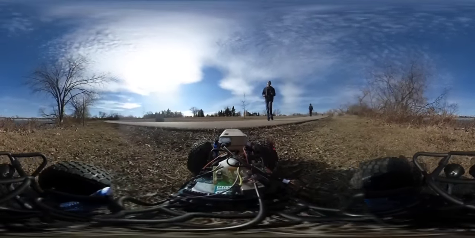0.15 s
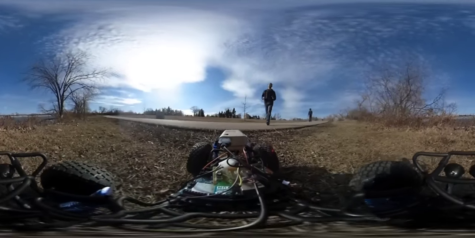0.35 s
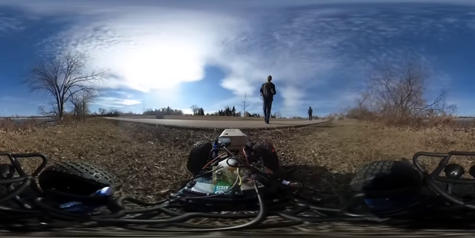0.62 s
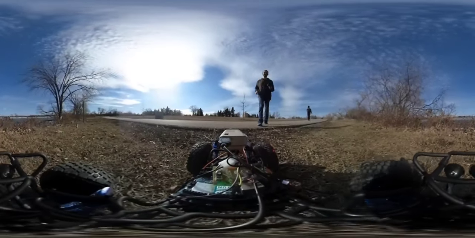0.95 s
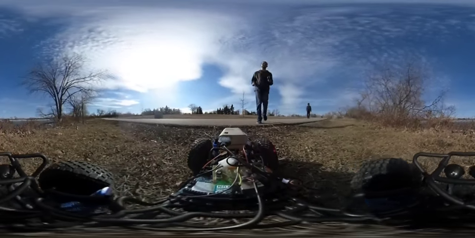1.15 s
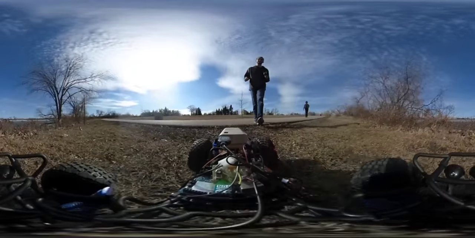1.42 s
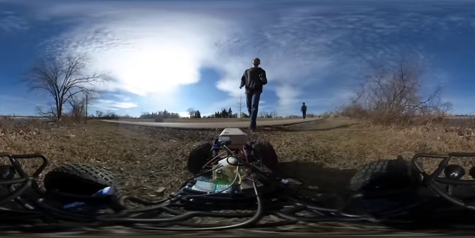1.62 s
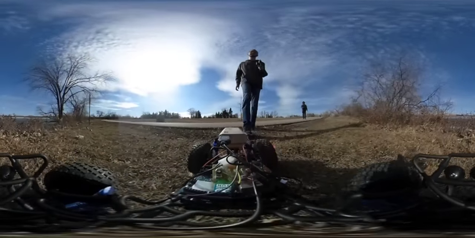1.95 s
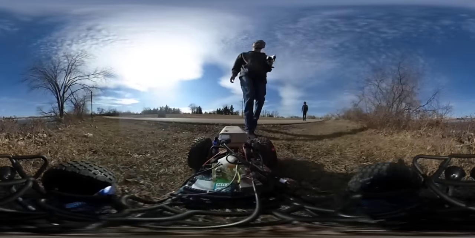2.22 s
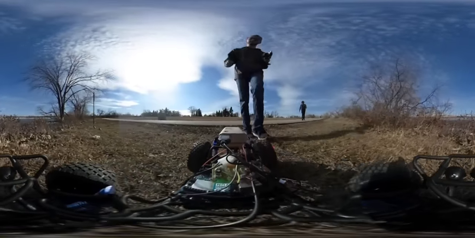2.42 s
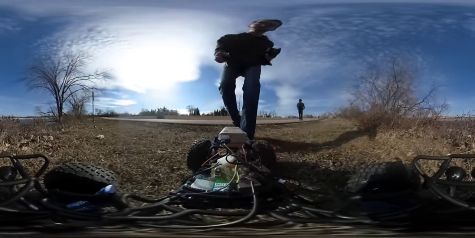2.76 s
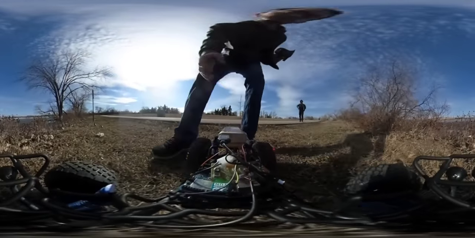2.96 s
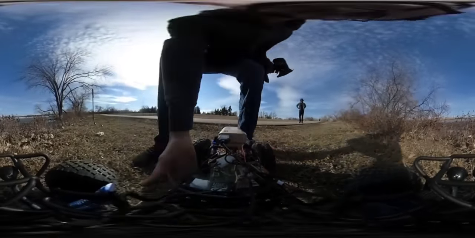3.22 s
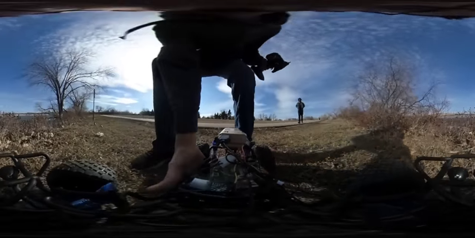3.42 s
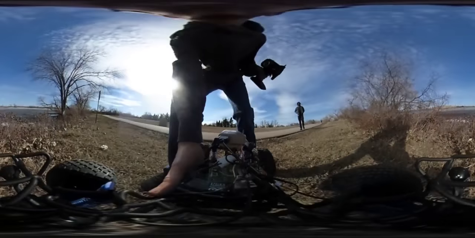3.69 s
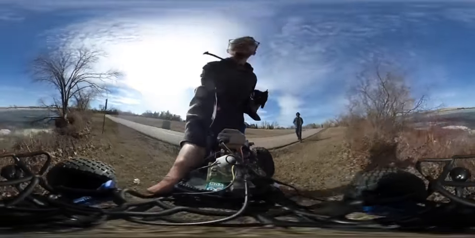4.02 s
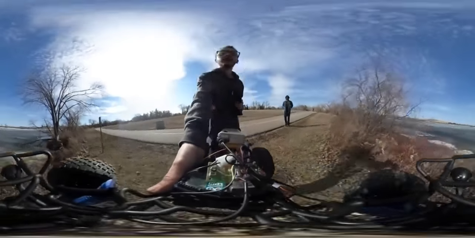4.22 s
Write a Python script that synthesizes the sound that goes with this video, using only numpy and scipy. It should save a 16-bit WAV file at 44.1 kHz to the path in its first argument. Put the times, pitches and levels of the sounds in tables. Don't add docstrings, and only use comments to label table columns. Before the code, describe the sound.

Outdoors in a windy field of dry grass, the microphone rides on a small plastic off-road car. Low, lumpy wind rumbles throughout with separate gusts. From the start, stalks crunch and shell knocks clatter, with a hard twig crack at 0.13 s and splitting bursts at 0.65 and 0.8 s. A crunch and thud come at 1.1 s, then a gritty gear whine dips and climbs from about 1.2 to 1.55 s, ending among loud knocks and cracks until 1.8 s. A long split and crunch at 2.04 s precede a quick rising whine at 2.1-2.3 s and a very hard, overloaded crack at 2.35 s. Smaller snaps fade; from 2.7 s cloth swells, swishing fullest near 3.1 s. Sharp cracks cluster at 3.35-3.55 s. Then light taps, short cloth rubs around 3.85 s and after 4.15 s, and a barely audible high gear whine finish over wind.

```python
import sys
import numpy as np
from scipy import signal
from scipy.fft import rfft, irfft
from scipy.io import wavfile
from scipy.ndimage import uniform_filter1d

SR = 44100
rng = np.random.default_rng(int(sys.argv[2]) if len(sys.argv) > 2 else 0)


def nominal_scale(level):
    x = np.asarray(level, float) / 20
    return 10 ** x


def log_audio(samples):
    frames = np.atleast_2d(samples).T
    limited = np.clip(frames, -1, 1)
    pcm = np.round(limited * 32767).astype(np.int16)
    wavfile.write(sys.argv[1], SR, pcm)


N = 192364


def evened(x):
    return x / np.sqrt(np.mean(x ** 2) + 1e-20)


def over_time(rows):
    s, *columns = np.transpose(rows)
    return [np.interp(np.arange(N) / SR, s, column) for column in columns]


def coloured(x, points):
    spectrum_hz, level_db = np.transpose(points)
    hz = np.fft.rfftfreq(x.shape[-1], 1 / SR)
    filter_db = np.interp(np.log(hz + 1), np.log(spectrum_hz + 1), level_db)
    return irfft(rfft(x) * nominal_scale(filter_db), x.shape[-1])


def wander(hz):
    return evened(signal.lfilter([1], [1, -np.exp(-2 * np.pi * hz / SR)], rng.standard_normal(N)))


def bursts(start_s, hold_s, level_db, rise_db_per_s, fade_db_per_s):
    t = np.arange(0, N / SR + .002, .001)[:, None]
    rising = rise_db_per_s * np.maximum(start_s - t, 0)
    fading = fade_db_per_s * np.maximum(t - start_s - np.abs(hold_s), 0)
    each = nominal_scale(level_db - rising - fading)
    return np.interp(np.arange(N) / SR, t[:, 0], np.linalg.norm(each, axis=1))


# start_s [s], level_db [dB]
WIND_LEVEL = [(0, -37), (.2, -23), (.6, -23.5), (1.25, -24.5), (1.33, -36), (1.5, -31), (2.2, -31),
              (2.7, -24.5), (3.5, -22.5), (4.18, -24.5), (4.23, -30), (4.36, -27)]
# pitch_hz [Hz], level_db [dB per Hz]
WIND_SPECTRUM = [(8.8, -37.5), (15, -2.5), (81, -1), (184, -7), (430, -20), (1840, -44.5), (3000, -82),
                 (3900, -111)]
# start_s [s], level_db [dB]
WIND_GUSTS = [(0.062, -18), (.33, -23.5), (.51, -28.5), (1.06, -20.5), (1.37, -22.5), (1.89, -27),
              (2.06, -20), (2.34, -24.5), (2.75, -23), (2.97, -26), (3.06, -20), (3.251, -22.5),
              (3.36, -20), (3.59, -17), (3.96, -21)]


def wind():
    lumps = nominal_scale(2.6 * uniform_filter1d(wander(hz=18.), 400))
    rumble = evened(coloured(lumps * rng.standard_normal(N), WIND_SPECTRUM))
    start_s, level_db = np.transpose(WIND_GUSTS)
    gusts = bursts(start_s, 0, level_db, rise_db_per_s=163.5, fade_db_per_s=216)
    steady = nominal_scale(over_time(WIND_LEVEL)[0])
    return np.hypot(steady, gusts) * rumble


def rings(modes, size=4096):
    hz, level_db, t60_s = np.transpose(modes)[:, :, None]
    t = np.arange(size) / SR
    soft_start = 1 - np.exp(-t * hz / 1.19)
    return nominal_scale(level_db - 60 * t / t60_s) * np.sin(2 * np.pi * hz * t) * soft_start


def breaks(per_s, spread_db):
    size = nominal_scale(spread_db * np.minimum(rng.exponential(1, N), 4))
    sign = rng.choice([-1., 1.], N)
    return evened(size * sign * (rng.random(N) < per_s / SR))


# pitch_hz [Hz], level_db [dB], t60_s [s]
TUB_MODES = [(408, -45, .04), (489.3, 12.5, 0.028), (667, 14.5, 0.021), (934, 22, 0.0075)]
# pitch_hz [Hz], level_db [dB], t60_s [s]
SHELL_MODES = [(1120, 0.5, 0.0098), (1360, 10, 0.0073), (1542, -10, 0.018), (1682, 0.5, 0.0096),
               (2101, -0.5, 0.0086), (2417, -6, 0.006), (2938, -11, 0.01)]
# pitch_hz [Hz], level_db [dB], t60_s [s]
THIN_MODES = [(3328, 5.5, 0.0046), (3854, -6.5, 0.0075), (4610, -1, 0.0046), (4870, -3.5, 0.0029),
              (5250, -7.5, 0.0081), (5950, 2, 0.0025), (7270, -7.5, 0.0041), (7880, -8.5, 0.0024),
              (9860, -6, 0.0025), (11120, -16.5, 0.005)]
# pitch_hz [Hz], level_db [dB per Hz]
RUSTLE_SPECTRUM = [(1500, -2), (3000, -14.5), (4800, -1), (6500, -35.5), (8300, -23.5), (9100, -33),
                   (10000, -35), (12000, -13)]
# start_s [s], hold_s [s], level_db [dB], fade_db_per_s [dB/s], dryness_db [dB]
STALK_LURCHES = [(0.037, 0.022, -10.5, 152, 4), (.055, 0.13, -15, 400, -1), (0.218, 0.09, -26.5, 200, -5),
                 (0.292, 0.023, -15, 591, -6), (0.372, 0.013, -21, 298, 4), (0.45, 0.027, -43.5, 68, -14),
                 (0.629, 0.093, -12.5, 317, 0.5), (0.649, .012, -6, 440, 6.5),
                 (0.814, 0.0056, -11, 373, -1), (0.866, 0.19, -35, 902, -3.5), (1.083, 0.024, -10.5, 91, 2),
                 (1.298, 0.32, -17, 203, -1.5), (1.647, 0.0089, -17, 153, 0), (1.71, 0.049, -27, 24.5, 3),
                 (2.011, .018, -10, 197, 3.5), (2.038, 0.025, -5, 147, 7.5), (2.176, 0.19, -20, 56.5, 3.5),
                 (2.582, 0.063, -25, 143, -1), (2.97, 0.16, -51, 100, 5.5), (3.362, 0.015, -14, 189, 3.5),
                 (3.485, 0.019, -15, 103, 6.5), (3.814, .015, -30, 128, 5), (3.964, 0.045, -33.5, 78, 10),
                 (4.248, 0.018, -36.5, 90, -14)]


def crunch():
    start_s, hold_s, level_db, fade, dryness_db = np.transpose(STALK_LURCHES)
    rise = 2797.5
    tub_lag_s = 0.0068
    shell = bursts(start_s, hold_s, level_db - 7.5, rise, fade)
    tub = bursts(start_s + tub_lag_s, hold_s, level_db - 11.5, rise, fade)
    air = bursts(start_s, hold_s, level_db + dryness_db - 23, rise, 1.43 * fade)
    clumps = nominal_scale(1.59 * uniform_filter1d(wander(hz=44.9), 100))
    shared = breaks(per_s=1200., spread_db=3.)

    def shaken(modes, gain):
        drive = []
        for _ in modes:
            own = breaks(per_s=1600., spread_db=5.0)
            drive.append(clumps * gain * (shared + 1.493 * own))
        ring = rings(modes)
        return signal.oaconvolve(drive, ring / np.linalg.norm(ring), axes=1)[:, :N].sum(0)

    stalks = 0.19 * shared + breaks(per_s=14000.0, spread_db=3.)
    rustle = .75 * evened(coloured(stalks, RUSTLE_SPECTRUM)) + shaken(THIN_MODES, nominal_scale(-5))
    return shaken(SHELL_MODES, shell) + shaken(TUB_MODES, tub) + clumps * air * rustle


# start_s [s], peak_db [dB], length_ms [ms]
TUB_THUDS = [(.0857, -10, 2.2), (0.632, -8.5, 2.1), (0.656, -4.5, 4), (0.9082, -18, 1.3),
             (1.0047, -18.5, 6.7), (1.098, -5, 3.6), (1.466, -5.5, 6), (1.567, 2, 1.7),
             (1.7378, -3.5, 0.57), (1.7893, -8, 4), (2.075, -7.2, 3.7), (2.116, -27, 1.3),
             (2.777, -29.5, 2.9), (2.871, -32, 5.2), (2.9707, -20.5, 3.6), (3.0783, -26.5, 5.3),
             (3.497, -4.5, 3.4), (4.275, -21, 2.2)]
# start_s [s], peak_db [dB], length_ms [ms]
TWIG_CRACKS = [(0.1337, 13.5, 3.6), (0.2296, -3, 1.8), (0.286, -1, 5.8), (.3117, -8, 4.7),
               (.383, -4.5, 1.4), (.652, -5.5, 1.7), (1.5589, 2.5, 2.5), (1.6128, -4.5, 1.3),
               (1.636, 5, 2.9), (2.3494, 5, 9.3), (2.3956, -8.5, 1.5), (2.484, -13.5, 5.8),
               (2.6755, -14.5, 8.1), (3.3806, 4.5, 1.8), (3.477, -7, 13), (3.4855, 11, 4.4),
               (3.8187, -17, 5.2), (3.9575, -14, 6), (3.9814, -12.5, 4.4), (4.0968, -19.5, 3.9),
               (4.268, -18.5, 3)]
# start_s [s], peak_db [dB], length_ms [ms]
STALK_SNAPS = [(.154, -31, 2.2), (0.3703, -11, 8.7), (.391, -16, 3), (.48, -23.5, 2.6), (0.882, -24, 3),
               (0.919, -27, 3), (0.982, -27, 2.7), (1.8268, -12.5, 1.1), (2.102, -6, 3.8),
               (2.294, -27, 8.5), (2.548, -19.5, 3), (2.5867, -11, 5.2), (2.9573, -26.5, 3.4),
               (3.362, -6.5, 2.3), (3.41, -9, 4.1), (3.5423, -1, 4), (3.724, -36, 5.5), (3.666, -28, 3.3),
               (3.8295, -14.5, 1.8), (3.886, -34, 4.3)]
# start_s [s], peak_db [dB], length_ms [ms]
SHELL_TAPS = [(.045, 0.5, 3.8), (.0533, 4, 2.6), (.2602, 1.5, 1.7), (.46, -24, 4.4), (.5092, -23.5, 2.9),
              (.576, -28.5, 4), (.595, -34, 4), (1.0845, -4, 1.6), (1.12, -10, 5), (1.1392, -13, 2.4),
              (1.916, -23.5, 3), (1.9783, -16, 3.5), (2.263, -7.5, 1.8), (2.3546, 16, 4.2),
              (2.4605, -10.5, 10), (2.6416, -16, 3.2), (2.709, -17, 5.2), (2.732, -22, 3.7),
              (2.821, -37, 3), (3.3491, -7, 4.4), (3.512, -3, 4.2), (3.7513, -20, 3.5), (3.8641, -20, 0.94),
              (3.999, -13, 3.7), (4.0188, -15, 1.6), (4.2366, -18.5, 4.1), (4.2607, -19, 0.99)]
# start_s [s], peak_db [dB], length_ms [ms]
TWIG_SPLITS = [
    (0.6445, -6, 4),
    (0.8186, 5, 2.4),
    (2.0382, 4.5, 9),
    (2.063, 1, 4.4),
    (2.327, -22, 3),
    (3.336, -21, 2.8),
    (3.552, -10, 5.7),
    (4.036, -15, 5.3),
]
# tub_db [dB above the peak], thin_db [dB above the peak]
BLOW_KINDS = [
    (5.5, -16),
    (-3, -9),
    (-7, -5),
    (-1.5, -17),
    (1.5, -0.8),
]


def knocks():
    tables = [TUB_THUDS, TWIG_CRACKS, STALK_SNAPS, SHELL_TAPS, TWIG_SPLITS]
    rows = [(*row, *kind) for table, kind in zip(tables, BLOW_KINDS) for row in table]
    start_s, peak_db, length_ms, tub_db, thin_db = np.transpose(rows)[:, :, None]
    t = np.arange(2048) / SR
    chance = rng.random((len(rows), 2, len(t)))
    decay = np.exp(-t / np.clip(length_ms / 1000, .0005, .05))
    blow = decay * (2 * chance[:, 0] - 1) * (chance[:, 1] < .07)
    blow[:, 0] = .8
    peak_db = np.minimum(peak_db, 5)
    parts = [
        (SHELL_MODES, peak_db - .3),
        (TUB_MODES, peak_db + tub_db - 4.0),
        (THIN_MODES, peak_db + thin_db - 3.5),
    ]
    out = np.zeros(N + SR)
    for modes, level_db in parts:
        place_db = 2.5 * rng.standard_normal((len(rows), len(modes)))
        answer = signal.fftconvolve(blow, nominal_scale(place_db) @ rings(modes), axes=1)
        answer *= nominal_scale(level_db) / abs(answer).max(1, keepdims=True)
        for start, sound in zip(start_s[:, 0], answer):
            out[round(start * SR):][:len(sound)] += sound
    return out[:N]


def resonate(x, hz, width_hz):
    turn = np.exp(2j * np.pi * np.cumsum(hz) / SR)
    r = np.exp(-np.pi * width_hz / SR)
    return (turn * signal.lfilter([1 - r], [1, -r], x / turn)).real


# [third partial, dB]
MOTOR_PUSHES = [
    [(1.17, 490, -36), (1.19, 480, -20), (1.22, 450, -30), (1.265, 445, -25)],
    [(1.265, 445, -25), (1.3, 447, -18), (1.312, 503, -19), (1.348, 507, -16), (1.36, 535, -23),
     (1.41, 570, -20), (1.455, 590, -26), (1.482, 603, -17), (1.545, 545, -30)],
    [(2.11, 415, -30), (2.14, 440, -16), (2.165, 490, -20), (2.19, 480, -30), (2.225, 515, -30),
     (2.25, 565, -25), (2.265, 580, -19), (2.29, 560, -34)],
    [(4.11, 575, -65), (4.15, 580, -58), (4.2, 575, -67)],
]


def gears():
    out, t = np.zeros(N), np.arange(N) / SR
    for push, load_db in zip(MOTOR_PUSHES, [-9, 0, 1, 11]):
        hz, third_db = over_time(push)
        gearbox_db = -28 - .14 * abs(hz - 545)
        fourth_db = np.minimum(third_db, gearbox_db) + load_db
        turns = np.cumsum(hz) / SR
        running = (t > push[0][0]) & (t < push[-1][0])
        levels_db = [third_db - 9, third_db, fourth_db + 2, fourth_db - 14]
        for k, level_db in zip(range(2, 6), levels_db):
            fuzz = evened(resonate(rng.standard_normal(N), k * hz, width_hz=60.))
            tone = np.sqrt(2) * np.cos(2 * np.pi * k * turns)
            out += running * nominal_scale(level_db) * (.9 * tone + .7 * fuzz)
    return out


# start_s [s], level_db [dB], swell_db_per_s [dB/s], fade_db_per_s [dB/s]
CLOTH_SWISHES = [
    (2.7, -56, 8.5, 48),
    (3.09, -46.5, 90, 254),
    (3.24, -66.5, 97, 200),
    (3.828, -49, 597, 383),
    (3.884, -52, 1500, 600),
    (4.156, -61.5, 83, 298),
    (4.248, -54, 600, 550),
    (4.36, -55.5, 236.5, 300),
]
# pitch_hz [Hz], level_db [dB per Hz]
CLOTH_SPECTRUM = [(2000, -6), (3500, -7.5), (6000, -13.5), (7800, -6), (9100, -11.5), (12000, -1)]


def swish():
    start_s, level_db, swell, fade = np.transpose(CLOTH_SWISHES)
    fibres = evened(coloured(breaks(per_s=8900.0, spread_db=6.0), CLOTH_SPECTRUM))
    return fibres * bursts(start_s, 0, level_db + 9.0, swell, fade)


def scene():
    mount = signal.butter(3, 340, "high", fs=SR, output="sos")
    chassis = signal.sosfilt(mount, crunch() + knocks() + gears())
    return (wind() + chassis + swish())[None]


def top_cut(x):
    return signal.sosfilt(signal.butter(12, 12050, fs=SR, output="sos"), x)


def record(dry):
    noisy = dry + nominal_scale(-65) * rng.standard_normal(dry.shape)
    return top_cut(np.clip(noisy, -1.05, 1.05))


dry = scene()
out = record(dry)
log_audio(out)
```